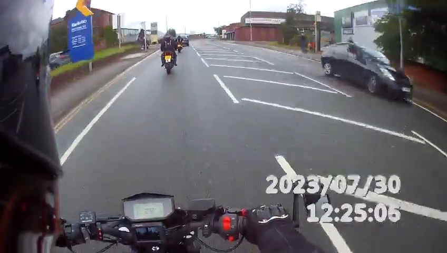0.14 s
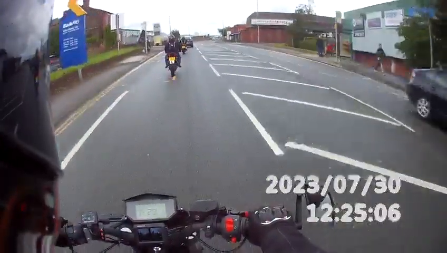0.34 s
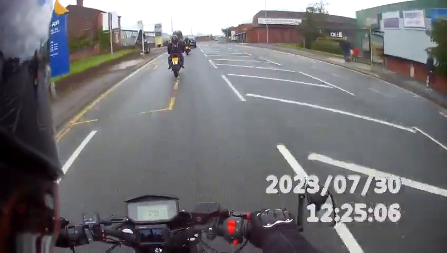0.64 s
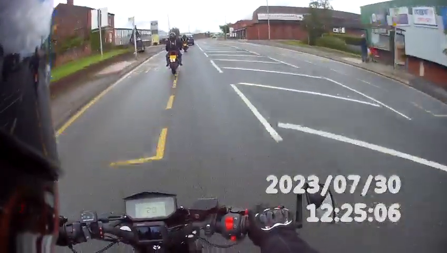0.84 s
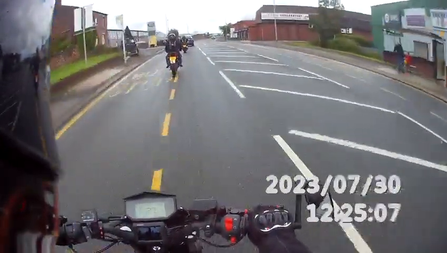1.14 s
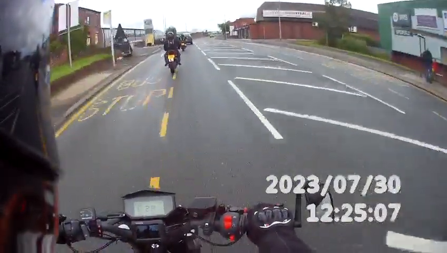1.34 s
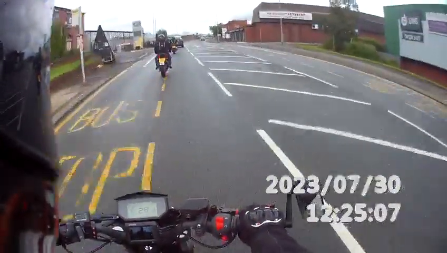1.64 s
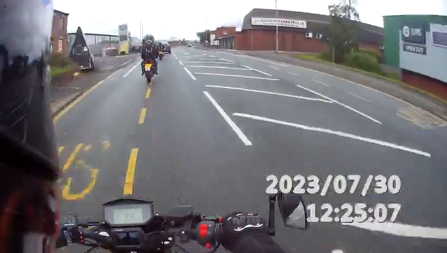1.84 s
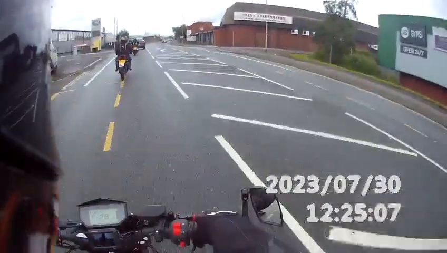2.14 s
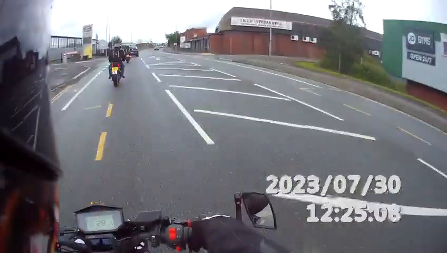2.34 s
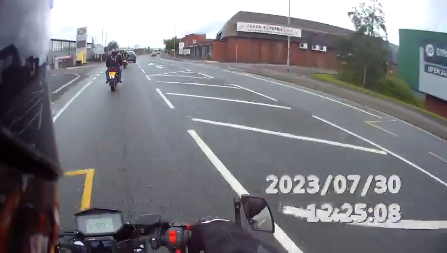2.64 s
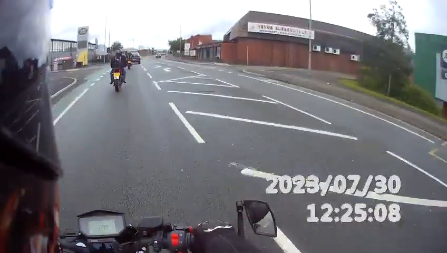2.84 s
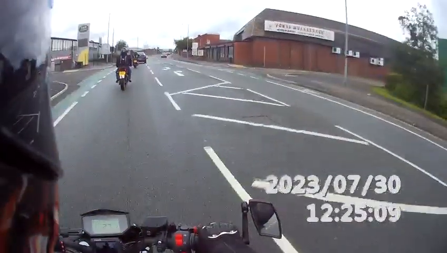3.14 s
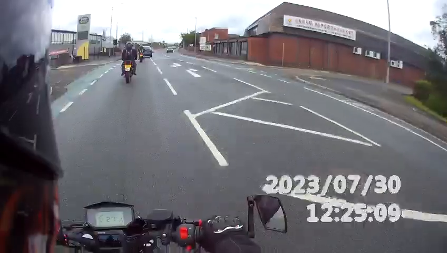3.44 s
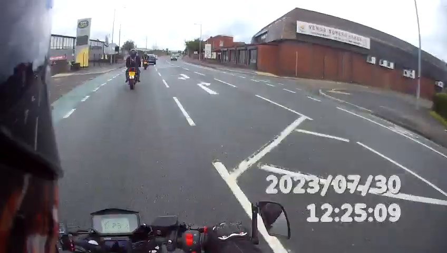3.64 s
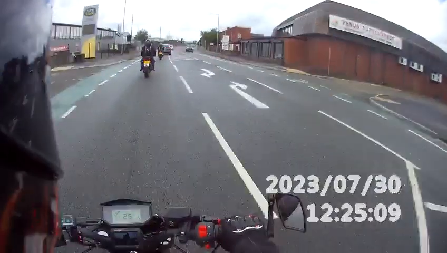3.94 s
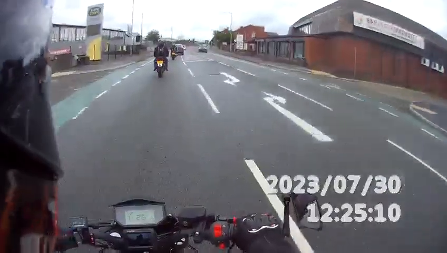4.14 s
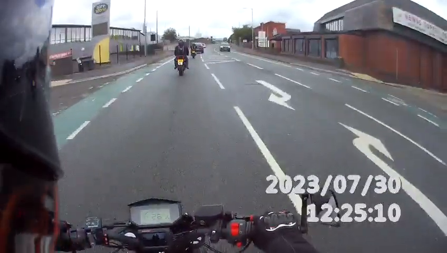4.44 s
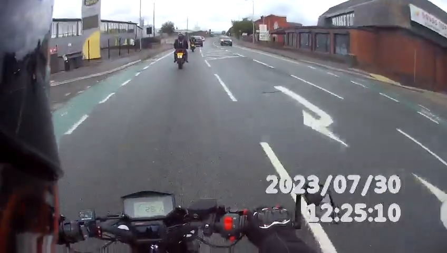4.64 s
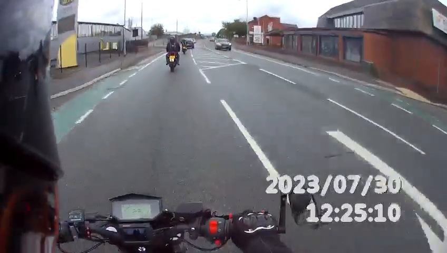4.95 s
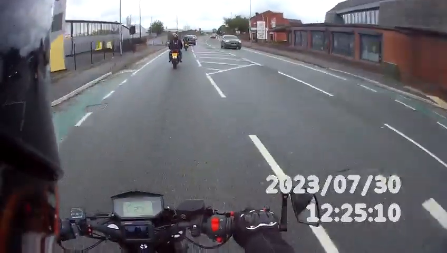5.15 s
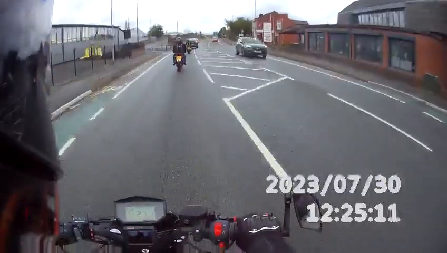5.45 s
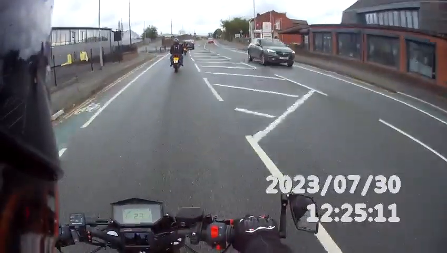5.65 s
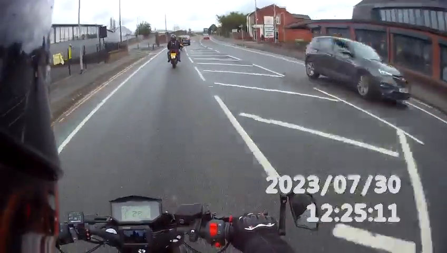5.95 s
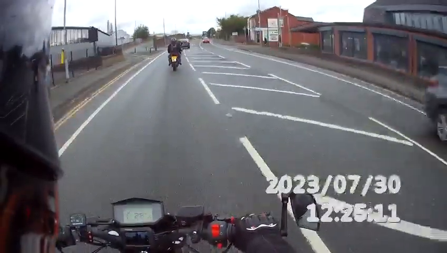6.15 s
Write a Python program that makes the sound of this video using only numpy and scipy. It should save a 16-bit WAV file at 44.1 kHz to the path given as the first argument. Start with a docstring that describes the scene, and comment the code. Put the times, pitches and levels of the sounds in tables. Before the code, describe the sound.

Steady wind roar with irregular low thumps surrounds a helmet microphone. Beneath it a droning motorcycle engine cruises, strengthens after a second, and sinks away just past two seconds, leaving hollow wind, soft scraping and quick high chirps. Then the drone comes back, climbing gently in pitch and growing rougher, while gusts and thin tyre hiss strengthen near the end.

```python
"""A motorcycle engine heard from the rider's helmet on a town road: it cruises, pulls, sinks almost to silence
under a shut throttle and pulls away again. The exhaust is a stack of sines on the crank rate, with clatter of
noise bands. Wind is shaped noise: it buffets the microphone, roars and rushes round the helmet and blows its hollow.
Tyres and valve gear hiss, as noise bands; in short spells something rubs (resonant noise) and squeaks (gliding sines).
"""
import sys
import numpy as np
from scipy import signal
from scipy.io import wavfile
from scipy.ndimage import uniform_filter1d

SR = 44100
rng = np.random.default_rng(int(sys.argv[2]) if len(sys.argv) > 2 else 0)


def materialize(psi):
    """Save the field psi as 16-bit PCM at rate SR to the path in sys.argv[1].

    A 1-D psi becomes a single channel; in a 2-D psi each row is a channel.
    """
    bounded = np.clip(np.atleast_2d(psi).T, -1, 1)
    quanta = np.round(bounded * 32767).astype(np.int16)
    wavfile.write(sys.argv[1], SR, quanta)


N = 278271


def engine_drive():
    """The crank's angle is its turning rate summed over time; level and throttle follow the riding."""
    # engine speed: start_s, turns_per_s
    turns = [(0, 34.3), (.85, 34.3), (1.85, 35.7), (2.2, 36), (3.6, 38.7), (4.0, 38.96), (4.5, 39.7),
             (5.0, 41.1), (5.3, 41.95), (5.6, 42.9), (6.31, 43.9)]
    # engine load: start_s, exhaust_db, throttle (0 cruise, 1 light pull, 2 open, 3 easing off at speed)
    load = [(0, -40.5, 0), (.85, -38.5, 0), (1.0, -32, 1.43), (1.45, -30, 2), (1.8, -33.5, 1.85),
            (1.86, -38, 0.089), (2.15, -40, 0), (2.3, -53, 0), (3.5, -55, 1), (3.64, -36.5, 0.8),
            (4.6, -36, 0.84), (4.8, -31.5, 1.77), (5.3, -31, 2), (5.45, -31.5, 2.2), (5.6, -33, 2.9),
            (5.9, -35, 3), (6.31, -39, 3)]
    (turns_per_s,) = in_time(turns)
    exhaust_db, throttle = in_time(load)
    crank = 2 * np.pi * np.cumsum(turns_per_s) / SR
    return crank, exhaust_db, throttle


def exhaust(crank, exhaust_db, throttle):
    """Uneven firing gives every order of the crank; the throttle shifts their balance, the silencer lifts some."""
    # exhaust orders, one row per multiple of the crank rate from the first up:
    # cruise_db, light_pull_db, open_db, easing_off_db
    orders = [(-5, -8.5, -15, -8), (-3, -9, -10.5, -6.5), (-9.5, -4, -4.5, -8.5), (-9, -13, -14, -15),
              (-8, -14, -16, -19), (-17, -18, -4.5, -7.5), (-7, -13.5, -9, -18), (-21, -3, -9.5, -11),
              (-8, -14.5, -15.5, -20), (-12.5, -3, -12.5, -28), (-7, -15.5, -18.5, -18),
              (-17.5, -17, -21, -20), (-16.5, -23.5, -22, -19), (-28, -20.5, -24, -16),
              (-20.5, -22, -31, -30), (-26, -17.5, -35, -31), (-38, -35, -23.5, -21), (-35, -39, -35, -35),
              (-26, -20, -26, -23)]
    # fixed resonances of the silencer: pitch_hz, width_hz, lift_db
    pipe = [(86, 14, 6), (138, 20, 0), (246, 22, 1), (350, 25, 1), (450, 60, 1)]
    wobble = 0.012 * drift(5)  # radians of crank: firings never land exactly on time
    out = 0
    for order, order_db in enumerate(orders, 1):
        balance_db = np.interp(throttle, range(4), order_db) + 0.8 * drift(2.5)
        phase = order * (crank + wobble) + rng.uniform(0, 2 * np.pi)
        out = out + from_db(balance_db) * np.sin(phase)
    return lifted(from_db(exhaust_db) * out, pipe)


def clatter(crank, exhaust_db):
    """The engine's mechanical noise follows the exhaust level and throbs with the crank."""
    # spectrum of the clatter: pitch_hz, level_db (per Hz)
    spectrum = [(1200, 2), (1500, 1), (2400, -10.5), (3200, -20.5)]
    clatter_db = -24.5  # relative to the exhaust setting
    noise = banded_noise(spectrum, gust_db=0.5, patchy_db=1.5)
    return from_db(exhaust_db + clatter_db) * noise * engine_beat(crank, exhaust_db, depth=0.27)


def engine_beat(crank, exhaust_db, depth):
    """A throb at once and twice per crank turn, deeper under load, as a gain around 1."""
    load = np.clip(from_db(exhaust_db + 28.0), 0, 1)
    return 1 + depth * load * (np.cos(crank) + 0.67 * np.cos(2 * crank))


def buffeting(swing_db):
    """Low noise of air on the microphone, evened out so that the airflow and the thumps alone shape its level."""
    # spectrum of the buffeting: pitch_hz, level_db (per Hz)
    spectrum = [(12, -3), (20, 1), (30, -9), (45, -2), (65, 2), (100, -7.5)]
    mid_db, follows = -46.5, 0.87  # level at middling airflow, share of its swing taken over
    noise = evened(banded_noise(spectrum, gust_db=0.0, patchy_db=0.5), span_s=0.06)
    return thumps(mid_db + follows * swing_db) * noise


def thumps(calm_db):
    """Buffeting gain climbs to each thump and sinks back to its calm level."""
    # thumps of air on the microphone: top_s, peak_db (added to the calm gain)
    tops = [(.37, -34), (.66, -40), (.95, -39), (1.12, -33), (1.6, -36), (2.06, -34.5), (2.6, -43),
            (2.76, -41), (3.15, -42), (3.53, -36), (3.83, -34.5), (4.31, -32), (4.86, -40), (5.17, -42),
            (5.4, -31), (5.5, -35), (5.65, -30), (5.92, -36)]
    rise_db_per_s, fall_db_per_s = 127, 128
    t = np.arange(N) / SR
    slopes = [peak_db + np.minimum(rise_db_per_s * (t - top_s), fall_db_per_s * (top_s - t))
              for top_s, peak_db in tops]
    return from_db(calm_db) + from_db(np.max(slopes, axis=0))


def wind_roar(swing_db, gust_db):
    """Low wind noise that follows part of the airflow's swing and swells in gusts and as cars pass."""
    # spectrum of the roar: pitch_hz, level_db (per Hz)
    spectrum = [(45, -8), (70, -5.5), (120, 1), (160, -2.5), (230, -2), (330, -7), (450, -18.5),
                (650, -35.5)]
    mid_db, follows = -36.5, 0.62  # level at middling airflow, share of its swing taken over
    noise = banded_noise(spectrum, gust_db=0.4, patchy_db=1.0)
    return from_db(mid_db + follows * swing_db + gust_db) * noise


def wind_rush(wind_db, gust_db, upper_db, crank, exhaust_db):
    """Air rushing round the helmet, coloured by the shell; gusts and passing cars shift its upper part
    separately."""
    # spectrum of the rush: pitch_hz, level_db (per Hz)
    spectrum = [(220, -6), (350, -6.5), (500, -5.5), (660, -13.5), (1000, -20), (1250, -21), (1550, -24),
                (2100, -29), (2800, -35), (3500, -39), (4200, -44), (7000, -47)]
    # resonances of the helmet shell: pitch_hz, width_hz, lift_db
    shell = [(820, 81, -2), (1007, 176, 2), (1506, 195, 0), (2040, 340, -6.5), (2430, 120, -7.5)]
    upper_hz = 1500  # where the upper rush begins
    rush = lifted(banded_noise(spectrum, gust_db=0.65, patchy_db=0.41), shell)
    rush = rush * engine_beat(crank, exhaust_db, depth=0.11)
    upper = signal.sosfilt(signal.butter(2, upper_hz, "high", fs=SR, output="sos"), rush)
    lower = rush - upper
    balanced = rms_one(lower + from_db(upper_db) * upper)
    return from_db(wind_db + gust_db) * gapped(balanced)


def airflow():
    """Airflow past the helmet between gusts, as levels of the rush and the hiss."""
    # airflow: start_s, rush_db, hiss_db
    wind = [(0, -43, -66), (.6, -41.5, -66), (1.0, -39.5, -64.5), (1.6, -39.5, -64.5), (1.9, -42, -66.5),
            (2.4, -39.5, -66), (2.72, -43.5, -65.5), (2.9, -44.5, -68), (3.4, -43, -68), (3.8, -43, -65.5),
            (4.5, -43, -66.5), (5.12, -40.5, -67), (5.25, -38.5, -65), (5.5, -37, -63), (6.31, -36, -62.5)]
    return in_time(wind)


def gusts_and_cars():
    """Each hump, a gust of wind or a passing car, is a smooth swell in dB for the rush, the roar and the upper
    rush."""
    # gusts and passing cars: top_s, half_length_s, rush_lift_db, roar_lift_db, upper_rush_lift_db
    rows = [(0.302, 0.37, 2.5, 4, -1.5), (0.355, 0.091, 1, 3, 4), (0.94, 0.24, 0, 3, 1.5),
            (1.3, .35, -1, 0.5, 1), (2.053, 0.25, 2, 3, 1.5), (2.304, 0.067, 2, -1, -1),
            (3.54, 0.15, 4.5, -0.5, -0.5), (4.33, 0.12, 1, 3.5, -3), (5.28, 0.14, 1.5, 6, 4),
            (5.52, 0.047, 2.5, 4.5, -0.5), (5.735, 0.081, 1.5, 2, 3.5), (6.094, 0.12, 0.5, 3.5, 0.5)]
    t = np.arange(N) / SR
    humps = [np.cos(np.pi / 2 * np.clip((t - top_s) / half_s, -1, 1)) ** 2 for top_s, half_s, *_ in rows]
    lifts_db = np.transpose(rows)[2:]
    return lifts_db @ humps


def hollow(swell_s):
    """Now and then the wind blows the helmet's hollow: noise through one resonance."""
    # spells of blowing: start_s, end_s, level_db
    spells = [(0, .8, -58), (2.593, 3.653, -47), (5.598, 6.31, -52)]
    gain = sum(from_db(level_db) * spell(start_s, end_s, swell_s) for start_s, end_s, level_db in spells)
    return gain * blown(hz=515, width_hz=85)


def hiss(hiss_db, gust_db, crank, exhaust_db, swell_s):
    """Tyres and valve gear: high noise with whistling bands, throbbing with the engine."""
    # spectrum of the hiss: pitch_hz, level_db (per Hz)
    spectrum = [(1500, -21.5), (3000, 0.5), (4000, -3.5), (5000, -5), (6300, -7), (7500, -7.5), (9600, -6),
                (11000, -9), (12000, -12.5), (15500, -10.5)]
    hump_share = 0.49  # share of a hump's rush lift that reaches the hiss
    noise = gapped(banded_noise(spectrum, gust_db=0.5, patchy_db=0.7)) + whistles(swell_s)
    return from_db(hiss_db + hump_share * gust_db) * noise * engine_beat(crank, exhaust_db, depth=0.13)


def whistles(swell_s):
    """Bands of resonant noise that stay put in pitch, flicker, and each grow stronger for a while."""
    # whistles: pitch_hz, width_hz, level_db (relative to the hiss), start_s, end_s, lift_db
    bands = [(3577, 150, -14, 3.3, 5.2, 6.5), (4700, 250, -19, 3.3, 6.0, 7),
             (5240, 50, -19.5, .55, 2.25, 7.5), (5230, 70, -27, 3.6, 4.7, 13),
             (6170, 350, -15, 2.8, 4.2, 3.5), (6900, 200, -22, .9, 1.9, 4),
             (9650, 2200, -12.5, 4.5, 5.4, 5.5)]
    out = 0
    for hz, width_hz, level_db, start_s, end_s, lift_db in bands:
        flicker_db = 1.5 * drift(9.0) + 0.88 * drift(1.2)
        band_db = level_db + lift_db * spell(start_s, end_s, swell_s) + flicker_db
        out = out + from_db(band_db) * blown(hz, width_hz)
    return out


def rubbing():
    """Dry friction noise in a few broad resonances, slipping unevenly."""
    # spells of rubbing: start_s, end_s, level_db
    spells = [(.87, 1.3, -74), (2.048, 2.356, -65), (2.363, 2.48, -70), (2.482, 2.74, -62.5),
              (5.22, 5.6, -77), (6.237, 6.31, -65)]
    # resonances that the rubbing excites: pitch_hz, width_hz, level_db
    modes = [(3160, 1200, -0.5), (4840, 1300, -8), (6260, 550, -11), (7200, 730, -6.5), (7660, 490, -11)]
    swell_s = 0.074
    noise = sum(from_db(level_db) * blown(hz, width_hz) for hz, width_hz, level_db in modes)
    gain = sum(from_db(level_db) * spell(start_s, end_s, swell_s) for start_s, end_s, level_db in spells)
    slipping = from_db(2.0 * drift(6.3))
    return gain * slipping * noise


def squeaks():
    """Short rough chirps that glide and waver in pitch."""
    # squeaks: start_s, peak_db, middle_hz, length_s, glide_hz (from this far below the middle to as far above)
    chirps = [(2.27, -53.5, 3340, 0.034, -30), (2.314, -59, 3170, 0.023, -20), (2.35, -63, 3170, .025, 30),
              (2.454, -65, 3230, 0.023, 20), (2.49, -56, 3320, .03, 60), (2.505, -56, 3310, 0.03, -70),
              (2.55, -53, 3400, 0.034, 90), (2.556, -59, 3110, 0.025, 40), (2.573, -54, 3200, 0.036, 80),
              (2.62, -58, 3390, .045, 60), (2.622, -57.5, 3090, 0.05, 60), (2.695, -59, 3330, 0.025, 0)]
    out, waver_hz = np.zeros(N), 35 * drift(60)
    for start_s, peak_db, middle_hz, length_s, glide_hz in chirps:
        start, size = round(start_s * SR), round(length_s * SR)
        pitch_hz = middle_hz + glide_hz * np.linspace(-1, 1, size) + waver_hz[start:start + size]
        tone = np.sin(2 * np.pi * np.cumsum(pitch_hz) / SR)
        out[start:start + size] += from_db(peak_db) * np.sqrt(np.hanning(size)) * tone
    return out


def gapped(x):
    """Reflections off the helmet partly cancel a few narrow bands."""
    # gaps: pitch_hz, width_hz, share_removed (0-1)
    gaps = [(2800, 150, 0.15), (3880, 330, 0.23), (5020, 160, 0.17), (7200, 330, 0.2)]
    return x - sum(share * resonance(x, hz, width_hz) for hz, width_hz, share in gaps)


def banded_noise(spectrum, gust_db, patchy_db):
    """Third-octave bands of noise that drift in level together and flicker each on their own; rms 1."""
    hz, level_db = np.transpose(spectrum)
    edges = hz[0] * 2 ** np.arange(0, np.log2(hz[-1] / hz[0]) + 1 / 3, 1 / 3)
    shared_db = gust_db * drift(9.2)
    white = rng.standard_normal((2, N))  # neighbouring bands take turns, so they stay independent
    out = 0
    for k, (low, high) in enumerate(zip(edges, edges[1:])):
        band = signal.sosfilt(signal.butter(2, [low, high], "band", fs=SR, output="sos"), white[k % 2])
        band_db = np.interp(np.log(low * high) / 2, np.log(hz), level_db)
        out = out + from_db(band_db + shared_db + patchy_db * drift(3.2)) * band
    return rms_one(out)


def blown(hz, width_hz):
    """Noise twice through one resonance; rms 1."""
    once = resonance(rng.standard_normal(N), hz, width_hz)
    return rms_one(resonance(once, hz, width_hz))


def lifted(x, modes):
    """Resonances added to the direct sound."""
    return x + sum(from_db(lift_db) * resonance(x, hz, width_hz) for hz, width_hz, lift_db in modes)


def resonance(x, hz, width_hz):
    """Two-pole band with gain about 1 on top."""
    r = np.exp(-np.pi * width_hz / SR)
    poles = [1, -2 * r * np.cos(2 * np.pi * hz / SR), r * r]
    return signal.lfilter([(1 - r * r) / 2, 0, (r * r - 1) / 2], poles, x)


def drift(rate_hz):
    """Slow chance: noise through a double one-pole low-pass, run in; spread about 1."""
    step = 40  # samples between the drift's points
    r = np.exp(-2 * np.pi * rate_hz * step / SR)
    noise = rng.standard_normal(N // step + 2002)
    slow = signal.lfilter([1], [1, -2 * r, r * r], noise)[2000:]
    return np.interp(np.arange(N) / step, np.arange(len(slow)), rms_one(slow))


def spell(start_s, end_s, swell_s):
    """0 outside, 1 inside, with straight ramps centred on both ends."""
    t = np.arange(N) / SR
    return np.clip(np.minimum(t - start_s, end_s - t) / swell_s + 0.5, 0, 1)


def evened(x, span_s):
    """Level swings slower than the span are flattened; rms 1."""
    power = uniform_filter1d(x ** 2, round(span_s * SR))
    return rms_one(x / np.sqrt(power + 0.1))  # the 0.1 limits the lift of quiet moments


def in_time(rows):
    """Each column of a table as a curve over all samples."""
    start_s, *columns = np.transpose(rows)
    return [np.interp(np.arange(N) / SR, start_s, column) for column in columns]


def rms_one(x):
    """Scale to rms 1."""
    return x / np.sqrt(np.mean(x ** 2) + 1e-20)


def from_db(db):
    """Decibels to gain."""
    return 10 ** (np.asarray(db) / 20)


def scene():
    """Engine, wind and small noises summed at one microphone."""
    crank, exhaust_db, throttle = engine_drive()
    wind_db, hiss_db = airflow()
    rush_hump_db, roar_hump_db, upper_db = gusts_and_cars()
    swing_db = wind_db + 41  # airflow around its middling level of -41 dB
    swell_s = 0.067  # how fast whistles and hollow come and go

    engine = exhaust(crank, exhaust_db, throttle) + clatter(crank, exhaust_db)
    wind = buffeting(swing_db) + wind_roar(swing_db, roar_hump_db) + hollow(swell_s)
    wind = wind + wind_rush(wind_db, rush_hump_db, upper_db, crank, exhaust_db)
    hissing = hiss(hiss_db, rush_hump_db, crank, exhaust_db, swell_s)
    return (engine + wind + hissing + rubbing() + squeaks())[None]


def record(dry):
    """A steep low-pass cuts the top."""
    cutoff_hz = 15000
    return signal.sosfilt(signal.ellip(14, 0.3, 70, cutoff_hz, fs=SR, output="sos"), dry)


dry = scene()
out = record(dry)
materialize(out)
```